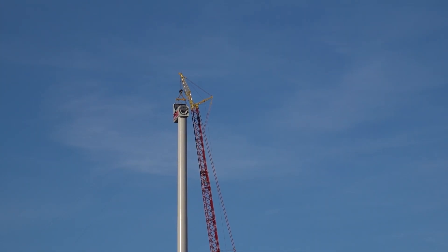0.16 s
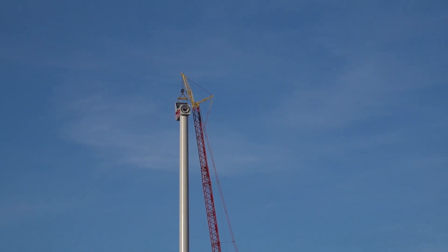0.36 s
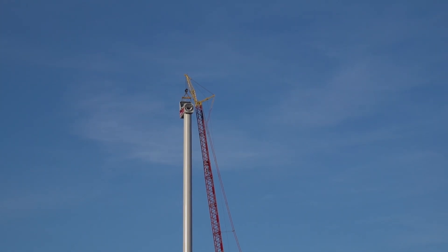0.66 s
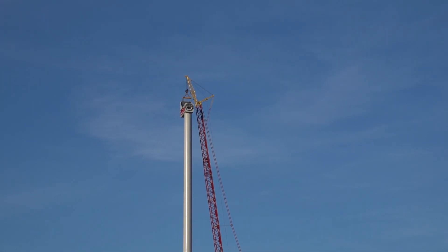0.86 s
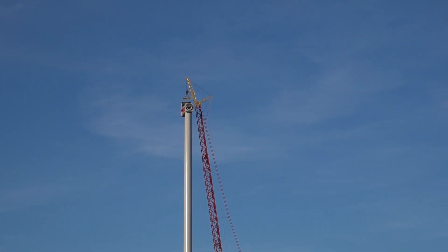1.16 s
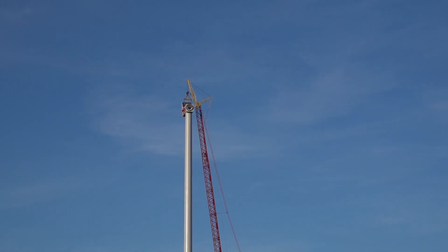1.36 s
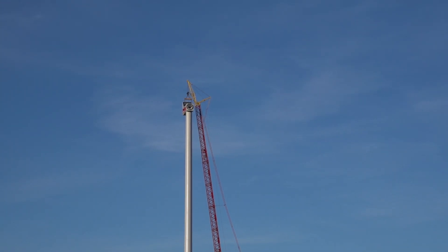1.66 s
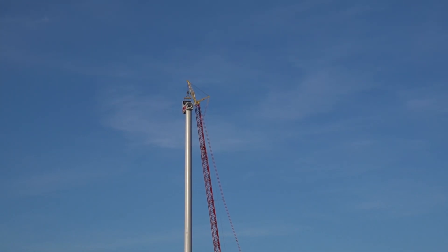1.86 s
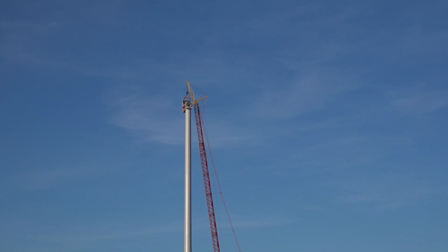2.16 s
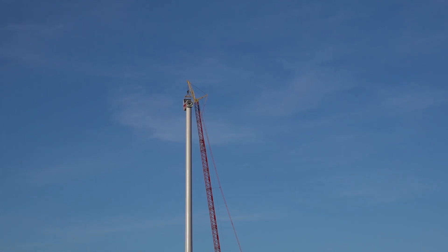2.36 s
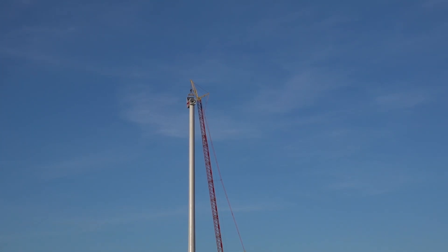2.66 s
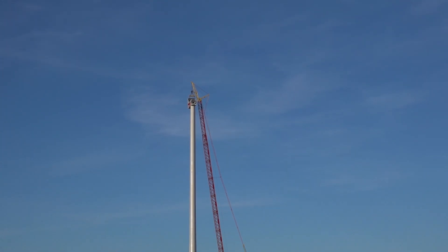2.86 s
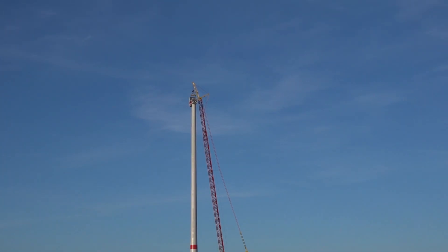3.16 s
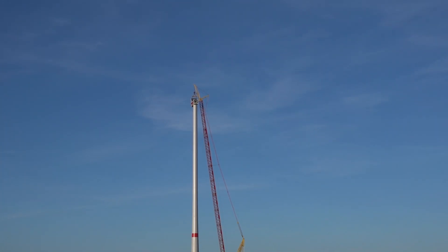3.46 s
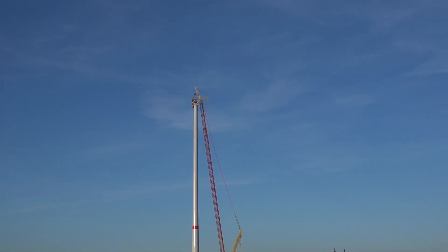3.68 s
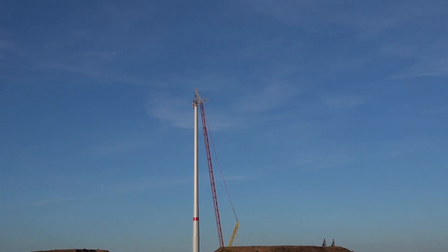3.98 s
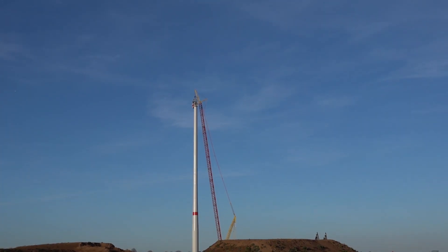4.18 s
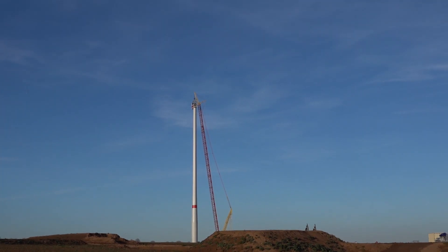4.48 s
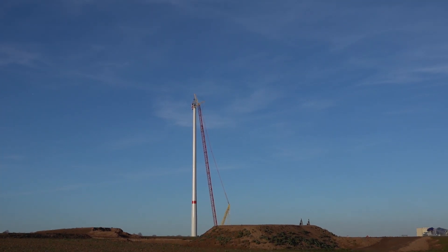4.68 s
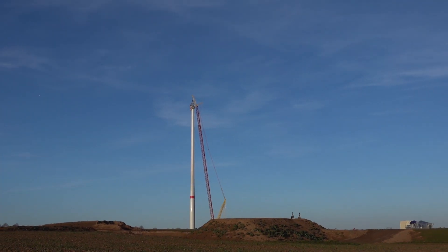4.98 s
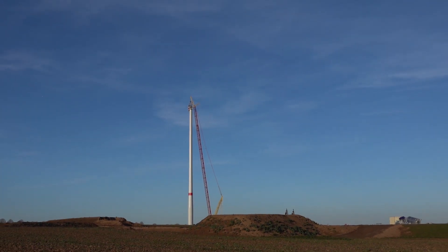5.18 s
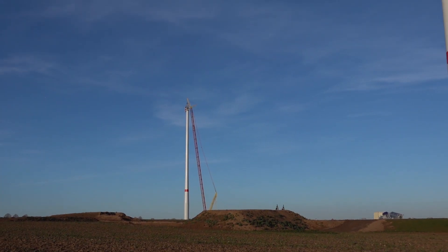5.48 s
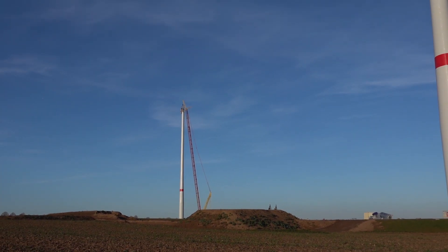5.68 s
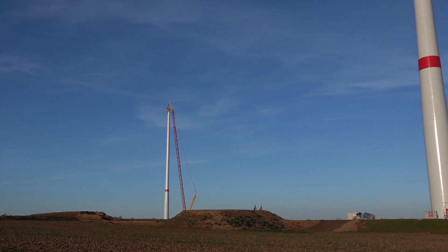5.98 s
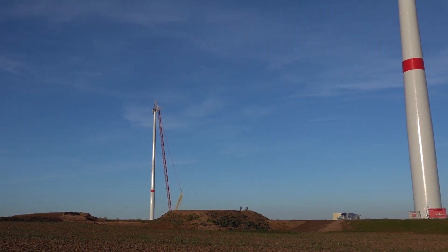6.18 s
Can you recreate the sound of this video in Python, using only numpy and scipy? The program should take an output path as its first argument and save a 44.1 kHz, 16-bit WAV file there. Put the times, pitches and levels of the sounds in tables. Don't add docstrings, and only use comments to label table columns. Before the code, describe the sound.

Outdoors on open farmland, a dull, broad hiss of distant motorway tyres runs throughout, leaning left. Wind gusts rumble and thump softly against the stereo microphone, stronger after the middle. Near five seconds a game bird on the right gives one brief harsh crow, echoed by hedges. At the end something dry rustles close by.

```python
import sys
import numpy as np
from scipy import signal
from scipy.fft import rfft, irfft, next_fast_len
from scipy.io import wavfile
from scipy.ndimage import uniform_filter1d, map_coordinates

SR = 44100
rng = np.random.default_rng(int(sys.argv[2]) if len(sys.argv) > 2 else 0)


def ratio_of_db(decibels):
    return 10 ** (np.asarray(decibels, float) / 20)


def materialize(psi):
    bounded = np.clip(np.atleast_2d(psi).T, -1, 1)
    quanta = np.round(bounded * 32767).astype(np.int16)
    wavfile.write(sys.argv[1], SR, quanta)


N = 279373
TIME = np.arange(N) / SR
SIZE = next_fast_len(N)
HZ = np.maximum(np.arange(SIZE // 2 + 1) * SR / SIZE, 1)

# (frequency [Hz], density [dB per Hz])
HISS_COLOUR = [(2650, -27), (4500, -1.5), (7670, -2), (11600, -2), (12800, -2), (15100, -3), (15500, -5)]
# (frequency [Hz], likeness [0-1])
HISS_LIKE = [(4500, 0.42), (8000, 0.38), (15000, 0.55)]

# (time [s], level change [dB], nearness [dB], tyre note rise [dB])
TRAFFIC = [(0.0, -1.5, -2, 1.5), (0.35, 1.5, -3, 0), (0.63, 0, -1.5, 0.5), (0.81, 0.5, 2.5, 0.5),
           (1.16, 2, -2, -.5), (1.43, 0, 2.5, 0), (1.71, 2, 0.5, 1), (2.13, -0.5, -2, -1),
           (2.45, 0, -1.5, 1), (2.7, -1.5, 1.5, 0), (3.25, 2, 0.5, 2), (3.9, 0, 4, -1),
           (4.11, -0.5, 1.5, -1), (4.38, 1.5, 0.5, 0), (4.73, 1.5, -0.5, -3), (5.22, 1, 1.5, 1),
           (5.61, 0, 0.5, -0.5), (6.33, 2.5, 1.5, 1)]
# (frequency [Hz], density [dB per Hz])
ROAD_COLOUR = [(18, -56), (30, -22.5), (86, -13.5), (163, -13), (250, -19.5), (323, -33), (426, -26),
               (588, -20), (922, -1), (1090, 1.5), (1570, -1.5), (1910, -4.5), (2870, -18), (3870, -33.5),
               (5000, -46.5), (6500, -73), (11000, -120)]
# (frequency [Hz], left minus right [dB])
ROAD_SIDE = [(200, 1), (400, 4), (700, 2), (1300, 7), (1750, 5.5), (2400, 11.5), (3000, 10.5), (4400, 3.5)]
# (frequency [Hz], likeness [0-1])
ROAD_LIKE = [(60, 1), (250, 1), (400, 1), (700, 0.75), (1400, 1), (1800, 1), (2200, 0.52), (2800, 0.97),
             (3500, 0.26)]
# (frequency [Hz], left lead [rad])
ROAD_LEAD = [(100, 0), (400, 0.7), (900, 0.19), (1700, 1.18), (2200, 1.34), (3800, 1.28)]
# (time [s], pitch [Hz], level [dB])
ENGINE = [
    (5.22, 468, -85),
    (5.3, 467, -68),
    (5.55, 464, -68),
    (5.64, 462, -85),
]

# (time [s], buffet level [dB])
GUST = [(0.0, -76), (0.6, -80), (0.85, -52), (1.3, -58), (1.43, -50), (1.7, -56.5), (2.03, -57.5),
        (2.26, -41.5), (2.46, -53), (2.54, -64), (2.9, -58), (3.14, -64), (3.7, -42), (4.5, -44),
        (4.78, -48), (4.85, -41.5), (5.6, -56.5), (6.33, -46)]
# (frequency [Hz], density [dB per Hz])
WIND_COLOUR = [(12, -52), (20, -34), (92, -4.5), (145, -1), (286, -8), (451, -21), (600, -30.5), (780, -59),
               (1320, -120)]
# (frequency [Hz], likeness [0-1])
WIND_LIKE = [(30, 1), (500, 0.81)]
# (frequency [Hz], left lead [rad])
WIND_LEAD = [(30, -0.28), (100, -0.37), (200, -.85), (450, -1.35)]
# (time [s], peak level [dB], centre [Hz])
THUMPS = [(0.897, -41, 158), (1.141, -39, 144), (1.427, -43, 195), (1.462, -35.5, 212), (1.575, -39, 146),
          (2.117, -33.5, 166), (2.268, -29.5, 174), (2.312, -37.5, 176), (2.35, -30, 207),
          (2.394, -36.5, 151), (2.645, -45, 134), (2.712, -41, 185), (2.997, -48, 161), (2.449, -31.5, 191),
          (3.592, -30.5, 250), (3.672, -30.5, 280), (3.698, -34, 183), (3.815, -28, 239), (3.86, -29, 182),
          (3.927, -35, 184), (4.169, -26.5, 203), (4.266, -28, 273), (4.345, -28, 190), (4.523, -28.5, 220),
          (4.562, -29.5, 221), (4.678, -37.5, 189), (4.892, -33.5, 207), (5.026, -31.5, 170),
          (5.882, -32.5, 200), (6.318, -29.5, 296)]

# (time [s], peak level [dB], centre [Hz], width [Hz], left minus right [dB])
TICKS = [
    (2.4893, -51, 6000, 9000, 11),
    (6.0492, -49.5, 6500, 1800, -6),
]
# (frequency [Hz], density [dB per Hz])
RUSTLE_COLOUR = [(2060, -32), (3500, 0), (3880, -14), (4650, 0), (5230, -11.5), (7320, -16.5), (8030, -21),
                 (9420, -26), (10700, -19), (12000, -25), (15600, -53), (22000, -120)]

# (time [s], pitch [Hz], tone level [dB], rasp level [dB])
CROW = [
    (4.78, 1084, -92, -74),
    (4.82, 1084, -77, -46),
    (4.85, 1098, -74, -35.5),
    (4.876, 1084, -49, -29.5),
    (4.889, 1086, -28.5, -52),
    (4.94, 1082, -31.5, -57),
    (4.975, 1070, -32.5, -53),
    (5.01, 1000, -35, -48),
    (5.035, 990, -82, -69),
]
# (multiple of pitch, right [dB], left [dB], towards the hedges [dB])
PARTIALS = [(1, -14, -23, -18), (1.5, -21, -28, -25), (2, 0, -18, 0), (2.5, -24, -34, -24),
            (3, -30, -32, -14), (3.5, -33, -41, -29), (4, -37, -36, -18), (4.5, -36, -45, -34),
            (5, -36, -44, -32), (5.5, -37, -47, -39), (6, -43, -51, -42), (6.5, -51, -58, -50),
            (7, -58, -60, -57), (8.5, -63, -63, -66), (9, -62, -62, -66), (9.5, -60, -61, -66)]
# (centre [Hz], width [Hz], level [dB])
THROAT = [(1750, 520, -1), (2350, 520, 0)]
# (frequency [Hz], density [dB per Hz])
BEAK = [(2000, -23), (3000, 8.5), (4600, -2), (5300, -5.5), (6300, -9.5), (7000, -15), (7900, -35),
        (9000, -24), (10200, -18.5), (12000, -36)]
# (delay [s], level [dB], left minus right [dB])
HEDGES = [
    (.075, -28, 1),
    (.148, -21, 0),
    (.176, -20.5, 2),
    (.245, -24, 3),
    (.3, -28, 3),
    (.345, -33, 3),
]


def level(x, db):
    return x * ratio_of_db(db) / np.sqrt(np.mean(x ** 2))


def curves(table):
    s, *columns = np.transpose(table)
    return [np.interp(TIME, s, c) for c in columns]


def across(table, hz=HZ):
    f, v = np.transpose(table)
    return np.interp(np.log(hz), np.log(f), v)


def walk(rate):
    k = int(SR / rate)
    held = rng.standard_normal(N // 64)[np.arange(N) // k]
    return 1.125 * uniform_filter1d(uniform_filter1d(held, k), k)


def port_noise(colour, like, lead=0, mid=None):
    noise = rng.standard_normal((2, SIZE))
    shared = noise[0] if mid is None else mid
    mid, side = rfft([shared, noise[1]], SIZE) * ratio_of_db(across(colour))
    c = np.clip(across(like), 0, .99)
    mid = mid * np.sqrt(1 + c)
    side = side * np.sqrt(1 - c)
    return np.array([(mid + side) * np.exp(1j * lead), mid - side])


def bands(spectra, centres_hz):
    for k, hz in enumerate(centres_hz):
        share = np.interp(np.log(HZ), np.log(centres_hz), np.arange(len(centres_hz)) == k)
        yield hz, irfft(spectra * share, SIZE)[:, :N]


def ring(x, hz, width_hz):
    return signal.lfilter(*signal.iirpeak(min(hz, .45 * SR), hz / width_hz, fs=SR), x)


def preamp():
    colour = [(20, -47), (1000, -4)] + list(HISS_COLOUR)
    return level(irfft(port_noise(colour, HISS_LIKE), SIZE)[:, :N], -76.5)


def engine():
    hz, db = curves(ENGINE)
    phase = 2 * np.pi * np.cumsum(hz + 9.0 * walk(30)) / SR
    return np.sin(phase) * ratio_of_db(db - 5 + 3.5 * walk(25))


def motorway():
    near_from_hz, near_full_hz, near_pan_db, tyre_hz = 1600, 2420, 0.05, 1300
    level_db, near_db, note_db = curves(TRAFFIC)
    lean = across(ROAD_SIDE) / 2
    spectra = port_noise(ROAD_COLOUR, ROAD_LIKE, across(ROAD_LEAD)) * ratio_of_db([lean, -lean])
    roar = 0
    for hz, band in bands(spectra, [440, 1070, 1510, 2450, 3480]):
        near = np.clip(np.log(hz / near_from_hz) / np.log(near_full_hz / near_from_hz), 0, 1.2)
        note = np.sign(hz - tyre_hz) * (700 < hz < 2000)
        db = (hz > 700) * level_db + near * near_db + note * note_db
        drift_db = near_pan_db * near_db * hz / 3000 + .5 * walk(3.4)
        roar = roar + band * ratio_of_db(db + .5 * walk(10) + np.array([drift_db, -drift_db]))
    return level(roar, -45) + engine()


def gusts():
    reach_db_per_db, reach_from_db = 0.3651, -47
    puff_db, puff_s = -16, 0.022
    puffs = sum(ratio_of_db(db + puff_db) * np.exp(-((TIME - s) / puff_s) ** 2) for s, db, _ in THUMPS)
    buffet = ratio_of_db(curves(GUST)[0] + 1.5 * walk(28))
    gust_db = 20 * np.log10(np.hypot(buffet, puffs))
    slow_db = uniform_filter1d(gust_db, SR // 2)
    upper_db = reach_db_per_db * (gust_db - reach_from_db)
    chance = rng.random((2, SIZE))
    strength = ratio_of_db(-2.2 * np.log(chance[1] + .03))
    eddies = (chance[0] < 260 / SR) * strength * np.sign(rng.standard_normal(SIZE))
    push = level(eddies, 0) + 0.65 * rng.standard_normal(SIZE)
    spectra = port_noise(WIND_COLOUR, WIND_LIKE, across(WIND_LEAD), push)
    out = 0
    for hz, band in bands(spectra / np.std(irfft(spectra[1])), 30 * 2 ** np.arange(5)):
        upper = np.clip(np.log2(hz / 140), 0, 1.6)
        steady = np.clip(1 - hz / 160, 0, 1)
        out = out + band * ratio_of_db(upper * upper_db + gust_db + steady * (slow_db - gust_db))
    return out * ratio_of_db(-1)


def thumps():
    t = np.arange(-600, 600) / SR
    strong = np.zeros(SIZE)
    for s, db, hz in THUMPS:
        at = int(s * SR)
        cycle = np.cos(2 * np.pi * hz * t) - np.exp(-(np.pi * .6) ** 2)
        pulse = cycle * np.exp(-(t * hz / 0.55) ** 2)
        strong[at - 600:at + 600] += ratio_of_db(db - 3.5) * rng.choice([-1, -1, 1]) * pulse
    spectra = rfft(strong) * np.exp(1j * np.outer([1, 0], across(WIND_LEAD)))
    return irfft(spectra, SIZE)[:, :N]


def housing_ticks():
    out = np.zeros((2, N))
    impulse = 1. * (np.arange(200) == 0)
    for s, db, hz, width_hz, pan_db in TICKS:
        click = ring(ring(impulse, hz, width_hz), hz, width_hz)
        at = int(s * SR)
        out[:, at:at + 200] += click / click.max() * ratio_of_db(db + np.array([[pan_db], [-pan_db]]) / 2)
    return out


def rustle():
    start_s, rise_s, start_db, swell_db_per_s = 6.04, .09, -68, 10
    colour = [(3000, -32)] + list(RUSTLE_COLOUR)
    grains = irfft(port_noise(colour, HISS_LIKE), SIZE)[:, :N] * ratio_of_db(.9 * walk(220))
    since = np.maximum(TIME - start_s, 0)
    rise = 1 - np.exp(-(since / rise_s) ** 2)
    return level(grains, 0.92) * rise * ratio_of_db(start_db + swell_db_per_s * since + .5 * walk(36))


def hedge_echo(away, away_db):
    field_t60_s, field_db = .9, -21
    shimmer_db, shimmer_hz, waver_s = 1.2, 60, 7e-5
    t = TIME[:SR]
    tail = ratio_of_db(field_db - 60 * t / field_t60_s) * np.clip(t / .06, 0, 1) / np.sqrt(.04 * SR)
    land = rng.standard_normal((2, SR)) * tail
    for s, db, pan_db in HEDGES:
        land[:, int(s * SR)] += ratio_of_db([db + pan_db / 2, db - pan_db / 2])
    echo = signal.fftconvolve(away[None] * ratio_of_db(away_db), land, axes=1)[:, :N]
    echo = np.array([map_coordinates(e, [(TIME + waver_s * walk(shimmer_hz)) * SR]) for e in echo])
    return echo * ratio_of_db(shimmer_db * np.array([walk(shimmer_hz), walk(shimmer_hz)]) - 2)


def crow_tone(hz, sag_hz, lock_s):
    half_db = np.maximum(-0.4242 * sag_hz, -26)
    bright_db = np.interp(TIME, [lock_s, lock_s + .05], (-3, 1)) - .035 * sag_hz
    phase = 2 * np.pi * np.cumsum(hz * (1 + 0.0035 * walk(150))) / SR
    voice = 0
    for k, *db in PARTIALS:
        wobble_db = (1 + 2.5 * (k != 2)) * walk(50)
        line_db = wobble_db + (k % 1 > 0) * half_db + (k - 2) * bright_db
        voice = voice + ratio_of_db(db)[:, None] * np.sin(k * phase + k * k) * ratio_of_db(line_db)
    return voice


def throat_rasp(rasp_db):
    chaos = rng.standard_normal((3, N)) * ratio_of_db(1.8 * walk(250))
    rasp = 0
    for hz, width_hz, db in THROAT:
        formant = chaos
        for _ in range(3):
            formant = ring(formant, hz, width_hz)
        rasp = rasp + ratio_of_db(db) * formant
    return level(rasp, 0) * ratio_of_db(rasp_db + np.array([[0], [-14], [-4]]))


def beak_air(rasp_db, tone_db):
    air_db = 20 * np.log10(np.hypot(ratio_of_db(rasp_db - 19), ratio_of_db(tone_db - 25)))
    air = irfft(rfft(rng.standard_normal((3, SIZE))) * ratio_of_db(across(BEAK)), SIZE)[:, :N]
    return level(air, 0) * ratio_of_db(air_db + np.array([[0], [-7], [7.5]]))


def bird():
    held_hz, lock_s = 1085, 4.885
    hz, tone_db, rasp_db = curves(CROW)
    sag_hz = np.maximum(held_hz - hz, 0)
    away_db = 15 * np.clip((lock_s - TIME) / 0.063, 0, 1) - 0.2809 * sag_hz
    on = (TIME > CROW[0][0]) & (TIME < CROW[-1][0])
    tone = crow_tone(hz, sag_hz, lock_s) * ratio_of_db(tone_db + 3.5)
    right, left, away = on * (tone + throat_rasp(rasp_db) + beak_air(rasp_db, tone_db))
    return np.array([left, right]) + hedge_echo(away, away_db)


def scene():
    wide = motorway() + (gusts() + thumps())
    return wide + bird() + (housing_ticks() + rustle()) + preamp()


def roll_off(x):
    return signal.sosfilt(signal.butter(12, 15680, fs=SR, output="sos"), x)


def record(dry):
    low_cut = signal.butter(2, 40, "high", fs=SR, output="sos")
    mix = signal.sosfilt(low_cut, dry) * ratio_of_db([[-.1], [.1]])
    return roll_off(mix)


dry = scene()
out = record(dry)
materialize(out)
```